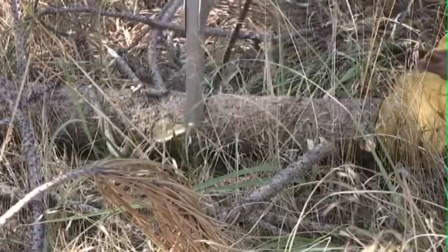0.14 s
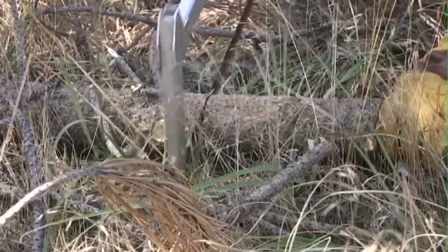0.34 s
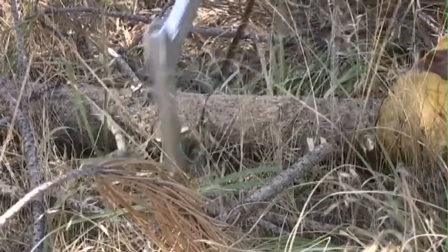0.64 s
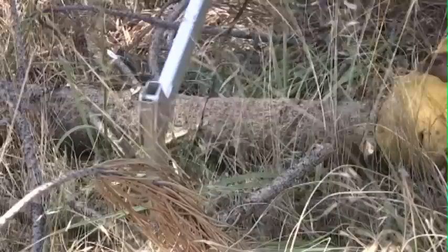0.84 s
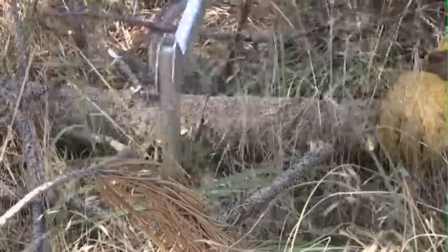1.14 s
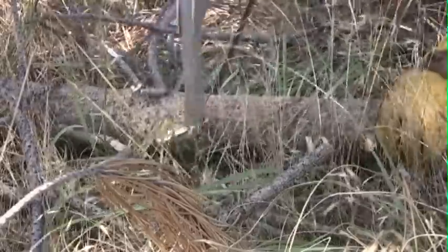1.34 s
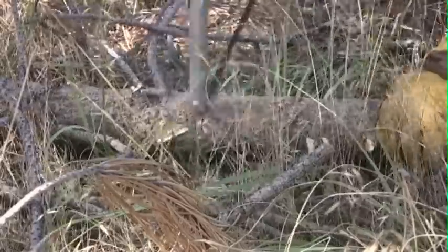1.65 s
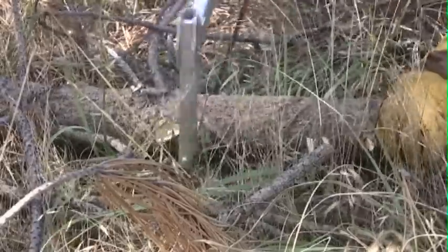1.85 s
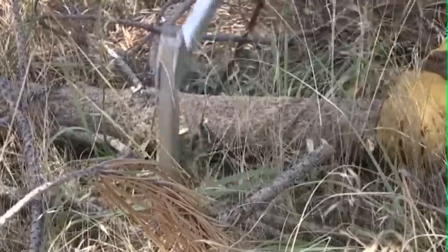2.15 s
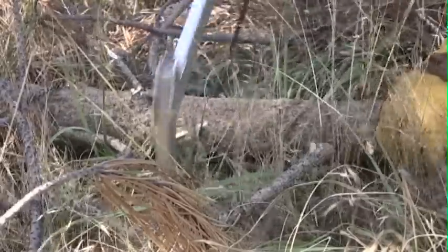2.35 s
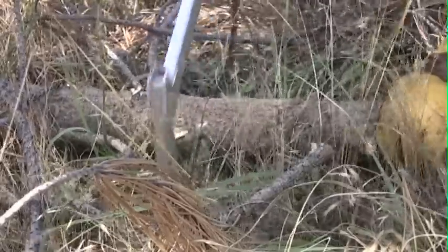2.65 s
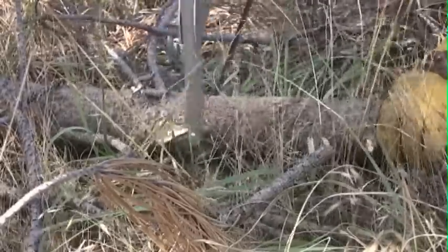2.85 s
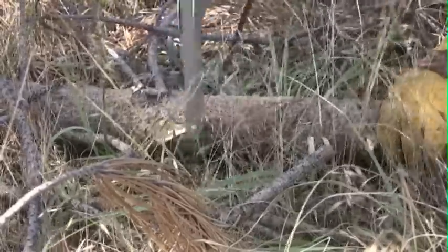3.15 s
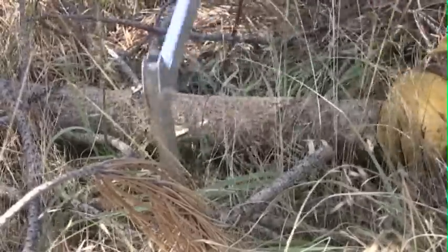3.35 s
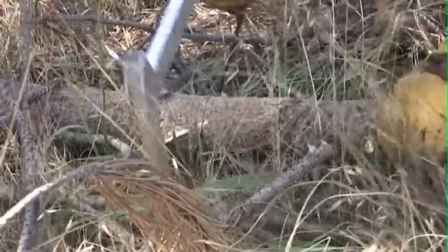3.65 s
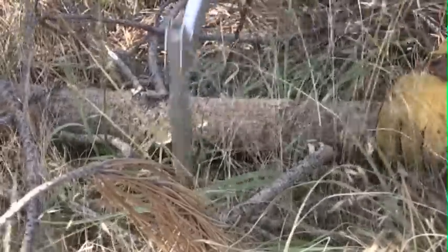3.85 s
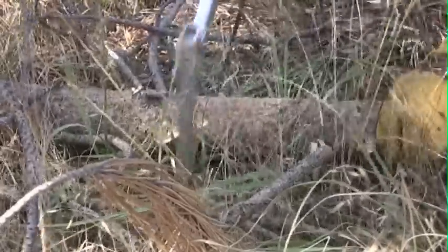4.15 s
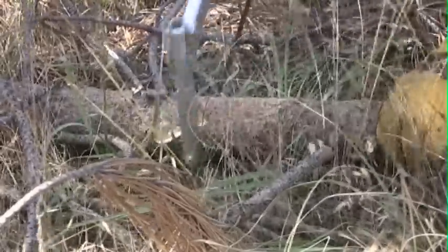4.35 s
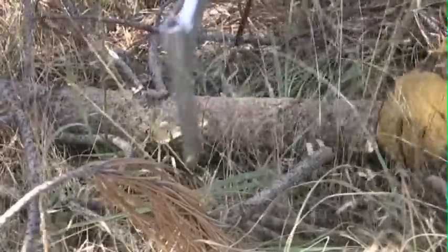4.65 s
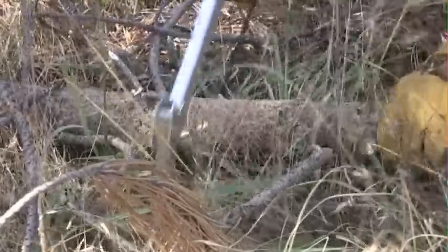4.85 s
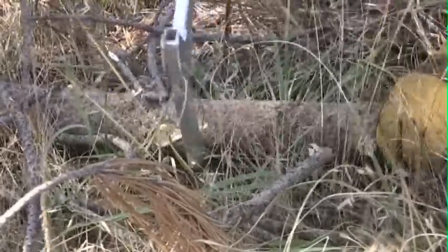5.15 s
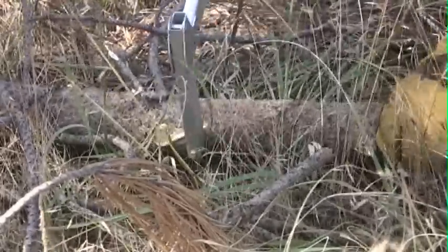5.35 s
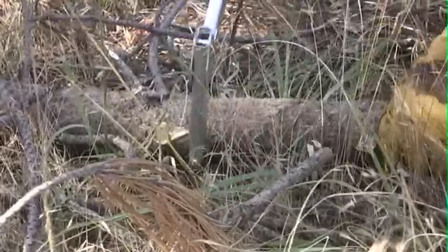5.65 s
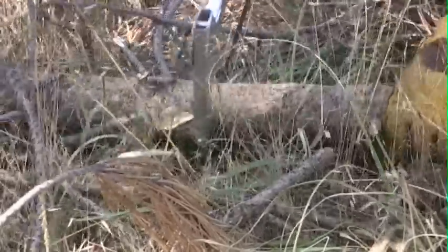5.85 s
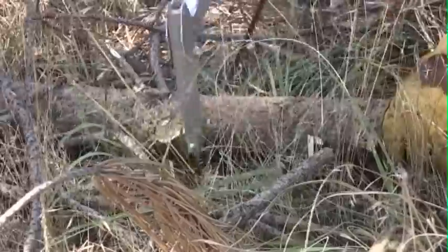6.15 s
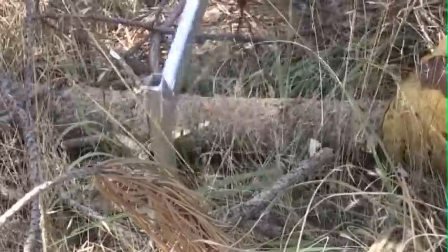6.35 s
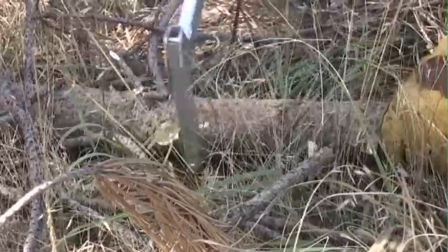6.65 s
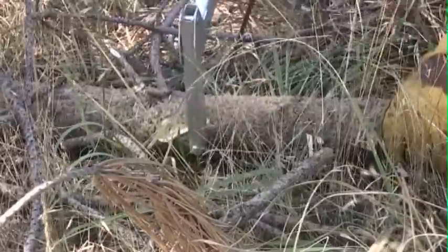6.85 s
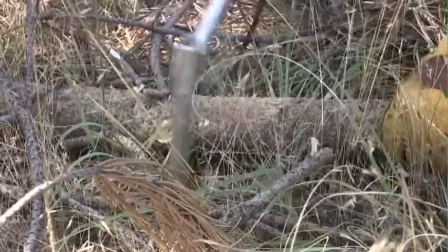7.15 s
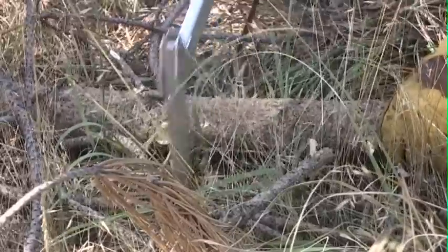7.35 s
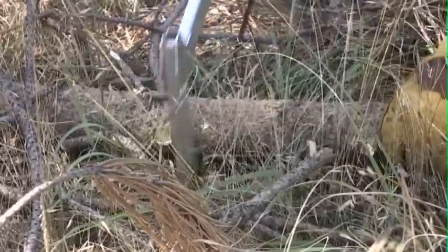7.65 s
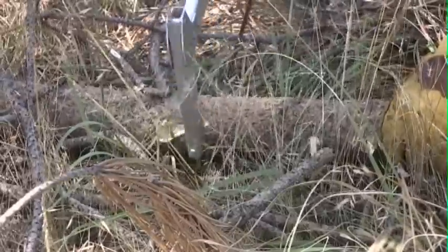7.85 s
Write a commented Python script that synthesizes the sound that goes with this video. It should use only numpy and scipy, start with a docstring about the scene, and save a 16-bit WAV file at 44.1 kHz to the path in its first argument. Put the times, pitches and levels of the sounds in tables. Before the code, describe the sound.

Brisk hand sawing of a dry log outdoors: steady raspy strokes, snags and clicks, then a break-up into rustles, scrapes and fresh strokes.

```python
"""A bow saw rasps to and fro through a dead log: random tooth jolts shake noise through blade and log notes.
Steel gives a bright fizz, wood a duller rasp; teeth snag, tick and judder among short pitched bursts.
Knocks and soft scuffs on the log ring two notes. Light drags and rustles fill the pauses with jolted noise.
A low sine hum wavers, lumpy filtered wind blows and low swings of pressure buffet the microphone."""
import sys
import numpy as np
from scipy import signal
from scipy.fft import rfft, irfft, next_fast_len
from scipy.io import wavfile
from scipy.ndimage import uniform_filter1d

SR = 44100
rng = np.random.default_rng(int(sys.argv[2]) if len(sys.argv) > 2 else 0)


def int16_out(signal):
    """Quantize to a 16-bit WAV file."""
    q = np.round(np.clip(np.atleast_2d(signal).T, -1, 1) * 32767)
    wavfile.write(sys.argv[1], SR, q.astype(np.int16))


N = 352359

# saw strokes: (start [s], length [s], rise [s], relative fizz level after the rise [dB],
# same before the release [dB], wood over fizz at the start [dB], same at the end [dB])
STROKES = [(0.073, 0.12, 0.032, -32, -26.5, -19.5, -12), (0.235, 0.11, 0.015, -22, -26.5, -13.5, -6),
           (0.374, 0.13, 0.053, -25.5, -21.5, -13.5, -16), (0.526, 0.12, 0.015, -25.5, -26.5, -10, -4.5),
           (0.677, 0.14, 0.056, -24.5, -28, -6.5, -28), (0.833, 0.098, 0.032, -21, -23.5, -11, -3.5),
           (0.937, 0.19, 0.097, -24.5, -23, -6, -23), (1.138, 0.12, 0.016, -31, -24, -8, -14),
           (1.286, 0.14, 0.048, -31.5, -28, -20, -18.5), (1.431, 0.11, 0.021, -30.5, -19.5, -14.5, -4.5),
           (1.533, 0.19, 0.088, -24.5, -25.5, -13, -10), (1.751, 0.066, 0.028, -15, -42, -13, -28),
           (1.804, 0.13, 0.026, -22, -41.5, -4.5, -41), (2.047, 0.12, 0.026, -29.5, -22.5, -12, -5),
           (2.212, 0.13, 0.036, -25.5, -25, -6, -18.5), (2.346, 0.12, 0.043, -26.5, -22.5, -7.5, -14),
           (2.488, 0.14, 0.017, -28.5, -27, -6, -17.5), (2.636, 0.11, 0.016, -34, -21, -10.5, -12.5),
           (2.795, 0.14, 0.032, -22, -29, -9.5, -29.5), (2.94, 0.12, 0.034, -26, -25, -13, -7),
           (3.046, 0.21, 0.11, -25.5, -35, -9.5, -14.5), (3.289, 0.082, 0.0071, -24, -20, -7.5, -17.5),
           (3.43, 0.12, 0.067, -23.5, -30.5, -13.5, -24), (3.579, 0.19, 0.045, -19.5, -48.5, -6.5, -20.5),
           (3.734, 0.14, 0.0042, -25.5, -28, -15, -13.5), (3.889, 0.1, 0.018, -32.5, -20, -9.5, -14.5),
           (4.009, 0.029, 0.0018, -23, -30.5, -14, -7), (4.035, 0.13, 0.028, -29, -24.5, -12.5, -14),
           (4.173, 0.12, 0.0041, -37, -21.5, -14.5, -9.5), (4.344, 0.14, 0.02, -28.5, -32, -15, -20.5),
           (4.491, 0.1, 0.031, -25.5, -23, -14, -12.5), (4.625, 0.091, 0.049, -24, -31, -18.5, -10.5),
           (4.702, 0.11, 0.0085, -23.5, -41.5, -28, -12), (4.793, 0.11, 0.023, -27, -25.5, -13, -9.5),
           (4.907, 0.068, 0.004, -36, -33.5, -18.5, -10), (4.966, 0.13, 0.0039, -24.5, -29.5, -11.5, -15.5),
           (5.128, 0.084, 0.0063, -51, -30.5, -12, -38), (5.203, 0.18, 0.022, -23.5, -43, -20.5, -24),
           (5.768, 0.15, 0.027, -29, -40, -14.5, -47), (6.012, 0.14, 0.038, -21.5, -40.5, -11.5, -25.5),
           (6.189, 0.08, 0.073, -23, -32, -21.5, -8.5), (6.314, 0.12, 0.042, -15.5, -29, -9, -14.5),
           (6.48, 0.12, 0.0015, -35.5, -26, -16, -28), (7.058, 0.09, 0.02, -22, -24.5, -10.5, -12),
           (7.193, 0.15, 0.007, -45, -24, -20.5, -16), (7.395, 0.092, 0.014, -34, -21.5, -11, -8.5),
           (7.498, 0.025, 0.0036, -16.5, -31, -12, 2.5), (7.559, 0.11, 0.046, -27.5, -28.5, -23, -32),
           (7.704, 0.17, 0.045, -21.5, -60, -8.5, -27), (7.835, 0.16, 0.065, -22.5, -48, -20, -16)]
# spectrum of the fizz: (frequency [Hz], relative density [dB])
FIZZ = [(1470, -44), (2500, -20), (4310, -13), (4950, -9.5), (5440, -11.5), (10600, -6), (12500, -0.5),
        (15000, 1.5), (16000, -3)]
# notes of the blade: (frequency [Hz], width [Hz], relative level [dB])
STEEL = [(3940, 250, -9), (4550, 200, -9), (5780, 150, -4), (7220, 200, -9), (9620, 300, -6),
         (11360, 150, -8.5), (13350, 150, -8), (12700, 300, -8)]
# notes of the log: (frequency [Hz], width [Hz], relative level [dB])
WOOD = [(211, 46, 2.5), (343, 14, 1.5), (481, 58, -1.5), (627, 113, 1.5), (1096, 154, -2),
        (1500, 380, -7.5), (1925, 136, -1.5), (3680, 3160, -11.5)]


def gain_of(db):
    """Decibels to amplitude."""
    return 10 ** (np.asarray(db) / 20)


def evened(x):
    """Scales to rms 1."""
    return x / np.sqrt(np.mean(x ** 2) + 1e-20)


def coloured(x, points):
    """Filters by a spectrum of (Hz, dB) points, straight lines over log frequency; rms 1."""
    point_hz, point_db = np.transpose(points)
    size = next_fast_len(N)
    hz = np.fft.rfftfreq(size, 1 / SR)
    level_db = np.interp(np.log(hz + 1), np.log(point_hz), point_db)
    return evened(irfft(rfft(x, size) * gain_of(level_db), size)[:N])


def ring(x, hz, width_hz):
    """One resonance of gain 1 at its centre."""
    return signal.lfilter(*signal.iirpeak(hz, hz / width_hz, SR), x)


def rung(x, modes, shifting_db=0.):
    """A body with several resonances; each swells and fades as the point of contact moves."""
    out = np.zeros(N)
    for k, (hz, width_hz, db) in enumerate(modes):
        push = x * gain_of(shifting_db * wander(0.023))
        out += (-1) ** k * gain_of(db) * ring(push, hz, width_hz)
    return out


def dying(x, decay_s):
    """Each impulse becomes a sudden step that fades exponentially."""
    return signal.lfilter([1], [1, -np.exp(-1 / (decay_s * SR))], x)


def jolts(per_s, spread_db, decay_s, steady):
    """Envelope of random jolts, a few large, over a steady part; rms 1."""
    sizes = gain_of(spread_db * np.minimum(rng.exponential(1, N), 3))
    struck = rng.random(N) < per_s / SR
    return evened(steady + evened(dying(sizes * struck, decay_s)))


def wander(width_s):
    """Slow random drift of rms 1: noise averaged twice."""
    width = round(width_s * SR)
    return evened(uniform_filter1d(uniform_filter1d(rng.standard_normal(N), width), width))


def impulses(times_s, db):
    """An impulse of the given height at each time."""
    x = np.zeros(N)
    x[np.round(times_s * SR).astype(int)] = gain_of(db)
    return x


def add_at(out, start_s, sound):
    """Mixes a sound in at its time, cut off at the end of the scene."""
    part = out[round(start_s * SR):][:len(sound)]
    part += sound[:len(part)]


def played(rows):
    """Each row rises, slides from its first level to its last and lets go; the wood follows by its bite."""
    release_s, edge_db = .03, 15  # a row starts and ends edge_db under its hold
    wood_edge_db = 4.5  # the wood sets in later and stops sooner than the bright part
    bright_power, wood_power = np.zeros(N), np.zeros(N)
    for start_s, length_s, rise_s, first_db, last_db, *bite_db in rows:
        first = max(round((start_s - rise_s) * SR), 0)
        last = min(round((start_s + length_s + release_s) * SR), N)
        t = np.arange(first, last) / SR - start_s
        held = np.clip((t - rise_s) / max(length_s - rise_s - release_s, .005), 0, 1)
        edges = np.maximum(1 - t / rise_s, 0) + np.maximum(1 - (length_s - t) / release_s, 0)
        level_db = first_db + (last_db - first_db) * held - edge_db * edges
        wood_over_db = np.interp(t, [0, length_s], [bite_db[0], bite_db[-1]])
        bright_power[first:last] += gain_of(level_db) ** 2
        wood_power[first:last] += gain_of(level_db - wood_edge_db * edges + wood_over_db) ** 2
    return np.sqrt(bright_power), np.sqrt(wood_power)


def lingering(envelope, decay_s, share):
    """Part of the sound dies away after its cause has stopped."""
    return envelope + share * dying(envelope, decay_s) / (decay_s * SR)


def grainy(x, spread_db):
    """Random patches of colour: short wide ones, and long narrow ones that sing for 50 ms."""
    for size in (128, 1024):
        z = signal.stft(x, nperseg=size)[2]
        patches = uniform_filter1d(rng.standard_normal(z.shape[::-1]), size=4, axis=0)  # over time
        patches = uniform_filter1d(patches, size=3, axis=1)  # over frequency
        x = signal.istft(z * gain_of(spread_db * evened(patches).T), nperseg=size)[1][:N]
    return evened(x)


def flexed(x, modes, spread_db, shift, climb_db=0):
    """Each stroke flexes the body: notes shift in pitch and strength; upper ones peak late in hard strokes."""
    deepest = 0.74  # share of a stroke at which the upper notes peak
    pieces = np.split(x, [round(row[0] * SR) for row in STROKES])
    chance = rng.standard_normal((len(pieces), len(modes), 2))
    hardness = [0] + [np.clip(max(row[-2:]) + 14, 0, 10) for row in STROKES]  # from the wood levels
    lengths_s = [row[1] for row in STROKES[:1] + STROKES]
    out = []
    for piece, draws, hard, length_s in zip(pieces, chance, hardness, lengths_s):
        progress = np.arange(len(piece)) / SR / length_s
        climb = climb_db * hard * np.maximum(.25 - abs(progress - deepest), -.5)
        total = np.zeros(len(piece))
        for k, (hz, width_hz, db) in enumerate(modes):
            level_db = db + spread_db * draws[k, 0] + climb * k
            total += (-1) ** k * gain_of(level_db) * ring(piece, hz * (1 + shift * draws[k, 1]), width_hz)
        out.append(total)
    return np.concatenate(out)


def drags_and_rustles():
    """Light drags and rustles in the pauses: soft bright jolted hiss, some with dull wood scuffing."""
    # drags and rustles: (start [s], length [s], rise [s], relative hiss level first [dB],
    # same last [dB], wood scuff over the hiss first [dB], same last [dB])
    drag_rows = [(1.879, .16, 0.065, -28.5, -26, -27, -14.5), (5.086, 0.084, 0.025, -39, -23, -29, -26.5),
                 (5.309, 0.095, 0.032, -45, -33.5, -17, -20), (5.354, 0.52, 0.13, -28.5, -58, -35, -47),
                 (5.584, 0.099, 0.028, -27, -79, -13, -10), (5.89, 0.135, 0.013, -47, -22.5, -58, -41),
                 (6.106, 0.18, 0.0036, -26, -33.5, -52, -35), (6.598, 0.15, 0.058, -33, -30, -47, -18),
                 (6.7, 0.23, 0.13, -33, -60, -19.5, -48)]
    # spectrum of the hiss: (frequency [Hz], relative density [dB])
    hiss_spectrum = [(710, -88.5), (1200, -24), (2150, -14.5), (3550, -12.5), (5300, -10.5), (16000, 5.5)]
    # faint stirring under everything: (time [s], relative level [dB])
    stirring_rows = [(0, -32), (.06, -59), (.12, -43), (3.1, -67), (3.25, -43), (3.45, -42), (5.6, -44),
                     (6.85, -39), (6.9, -39), (7.02, -53.5), (7.2, -35.5), (7.99, -39)]
    drag, scuff = played(drag_rows)
    rubbing = jolts(160, 5., 0.002, steady=1.9) * rng.standard_normal(N)
    hiss = grainy(coloured(rubbing + 1.2 * flexed(rubbing, STEEL, 2.5, .04), hiss_spectrum), 2.5)
    stirring_db = np.interp(np.arange(N) / SR, *np.transpose(stirring_rows))
    stirring = gain_of(stirring_db + 4.6 * wander(0.059))
    thin_hiss = evened(np.gradient(hiss) + .05 * hiss)  # mostly the slope of the hiss
    wood = evened(rung(rubbing, WOOD[3:], 4.))
    return drag * hiss + stirring * thin_hiss + (scuff + 0.0076 * stirring) * wood


def surroundings():
    """Lumpy wind is filtered noise; the low hum is a sine wavering in pitch and level."""
    # surroundings: (time [s], relative wind level [dB], relative hum level [dB])
    air_rows = [(0.0, -44.5, -53), (0.38, -90, -40.5), (1.11, -51, -53), (1.24, -54, -41), (1.88, -55, -52),
                (1.96, -35, -52), (2.29, -25, -47), (2.4, -34.5, -41), (3.0, -36, -46), (3.69, -37, -55),
                (3.83, -33, -36), (3.96, -45, -48), (4.81, -34, -43.5), (4.94, -50, -62),
                (5.23, -48, -45.5), (5.47, -62, -43.5), (5.82, -63, -42.5), (5.92, -65.5, -39),
                (5.94, -57.5, -59), (6.41, -57, -37), (6.63, -67, -85), (6.76, -53.5, -43),
                (6.98, -78, -45), (7.03, -63, -63), (7.2, -59, -47.5), (7.43, -54.5, -52), (7.99, -70, -58)]
    # spectrum of the wind: (frequency [Hz], relative density [dB])
    wind_spectrum = [(15, -64.5), (25, -40), (55, -4.5), (91, -0.5), (130, -0.5), (330, -18.5), (430, -37),
                     (730, -120)]
    mean_hum_hz = 87.3
    s, *columns = np.transpose(air_rows)
    wind_db, hum_db = (np.interp(np.arange(N) / SR, s, c) for c in columns)
    wind = coloured(rng.standard_normal(N) * gain_of(4.9 * wander(0.012)), wind_spectrum)
    turns = np.cumsum(mean_hum_hz * (1 + 0.054 * wander(0.0453))) / SR
    hum = np.sqrt(2) * np.sin(2 * np.pi * turns) * gain_of(5.3 * wander(0.071))
    return gain_of(wind_db + 2.0) * wind + gain_of(hum_db) * hum


def saw():
    """The same tooth jolts shake the steel blade and the log; harder bite sounds more wood."""
    fizz, wood = played(STROKES)
    teeth = jolts(300, 0.9, 0.008, steady=0.7)
    tearing = teeth * jolts(500, 3., .0008, steady=1.8) * rng.standard_normal(N)
    steel = grainy(coloured(tearing + 3. * flexed(tearing, STEEL, 3., .02), FIZZ), 2.4)
    fibres = teeth * jolts(150, 0.41, 0.00053, steady=4.4) * rng.standard_normal(N)
    log = grainy(flexed(fibres, WOOD[1:], 2.5, .025, climb_db=0.21), 2.8)
    deepening = gain_of(np.linspace(-7, 0.5, N))  # the lowest note grows as the cut deepens
    log = log + 0.5 * deepening * evened(ring(fibres, *WOOD[0][:2]))
    return 1.36 * lingering(fizz, 0.0017, 0.091) * steel + 1.287 * lingering(wood, 0.0018, 0.11) * log


def pitched_bursts():
    """Cracks, scrapes, narrow squeaks and low notes: short noise, each through its own resonance."""
    # pitched bursts: (time [s], peak [dB], frequency [Hz], width [Hz])
    burst_rows = [(0.23, -24, 5000, 4000), (0.539, -23, 2840, 1200), (0.637, -16.5, 1970, 596),
                  (0.646, -16.5, 2000, 603), (0.996, -25.5, 378, 69.6), (1.171, -19, 2920, 1500),
                  (1.18, -22, 3040, 1200), (1.216, -20, 3160, 800), (1.228, -18, 3450, 1200),
                  (1.7608, -25, 2800, 1800), (1.7715, -24, 6100, 900), (1.818, -15, 2920, 1500),
                  (1.832, -14, 2860, 1200), (1.84, -18, 3000, 1200), (3.12, -23, 373, 40),
                  (4.6608, -21.5, 2450, 2500), (4.911, -29, 1900, 90), (4.983, -29.5, 1990, 90),
                  (5.1295, -25, 3400, 2000), (5.14, -22.5, 3750, 2500), (5.18, -21, 4600, 2000),
                  (5.2127, -25, 2080, 800), (5.218, -20, 4200, 2500), (5.245, -33, 1100, 120),
                  (5.26, -16, 6000, 2500), (5.343, -45, 3600, 120), (5.355, -48, 1480, 120),
                  (5.371, -52, 1500, 120), (6.043, -16.5, 4530, 1500), (6.197, -27, 4970, 900),
                  (6.251, -29, 5160, 900), (6.287, -29, 4100, 1200), (6.674, -33, 2250, 900),
                  (6.829, -38, 1890, 700), (6.937, -39.5, 4640, 2000), (7.1085, -14, 1820, 700),
                  (7.306, -25.5, 3650, 700), (7.393, -33, 5000, 4000)]
    decay_s = 0.0019  # of the noise; narrow resonances ring longer
    out, t = np.zeros(N), np.arange(1500) / SR
    noise = rng.standard_normal((len(burst_rows), len(t))) * np.exp(-t / decay_s)
    for (s, peak_db, hz, width_hz), burst in zip(burst_rows, noise):
        sound = ring(ring(burst, hz, width_hz), hz, 2 * width_hz)
        add_at(out, s, gain_of(peak_db) * sound / abs(sound).max())
    return out


def knocks_and_scuffs():
    """Knocks and soft scuffs on the log: a short push and a fading rattle ring two notes."""
    # knocks and scuffs: (time [s], relative level [dB], thud over the hollow note [dB])
    knock_rows = [(0.246, -22, -20), (0.494, -27, -5), (1.082, -11, -10), (1.687, -11, -9),
                  (2.002, -17, -10), (2.31, -11, -11), (2.6, -16.5, -10), (2.911, -22, -6),
                  (3.201, -10.5, -10), (3.525, -18, -15), (3.84, -10.5, -14.5), (4.137, -8.5, -15.5),
                  (4.213, -28.5, -26), (5.307, -22, -12), (5.607, -34.5, 3.5), (5.797, -39.5, 3.5),
                  (6.244, -18.5, -5), (6.829, -47.5, 15), (7.328, -32.5, 10), (7.924, -36, 6.5)]
    thud_hz, thud_width_hz = WOOD[0][:2]
    out = np.zeros(N)
    for s, knock_db, thud_db in knock_rows:
        hollow_hz = 690 * rng.uniform(0.91, 1.06)  # each lands at a slightly different spot
        push = np.zeros(4000)
        push[:30] = np.hanning(30)
        push[30:900] = 0.5 * rng.standard_normal(870) * np.exp(-np.arange(870) / 150)  # rattle
        hollow = ring(ring(push, hollow_hz, 170), hollow_hz, 330)
        thud = ring(ring(push, thud_hz, thud_width_hz), thud_hz, 200)
        add_at(out, s, gain_of(knock_db) * (3.98 * hollow + 14.6 * gain_of(thud_db) * thud))
    return out


def ticks():
    """Each tick is a millisecond of bright noise of its own colour with a faint after-rattle."""
    # bright ticks: (time [s], peak [dB])
    tick_rows = [(0.5348, -8), (1.1644, -9), (1.7718, -8), (2.0708, -11), (2.4364, -9), (2.6654, -14),
                 (3.2968, -8), (3.6847, -14), (3.7461, -7), (3.7504, -4), (4.3619, -9), (4.3906, -8),
                 (4.6627, -3), (4.671, -6), (4.681, -4), (4.691, -8), (4.7008, -5), (4.7175, -8),
                 (4.9819, -4), (5.001, -7), (5.011, -8), (5.028, -8), (5.037, -6), (5.0594, -4),
                 (5.4578, -12), (5.8105, -11), (6.1557, -12), (6.4795, -8), (6.484, -7), (6.489, -8),
                 (6.5, -7), (6.503, -6), (6.509, -9), (6.514, -8), (6.518, -9), (6.6731, -13), (6.727, -7),
                 (6.8027, -3), (7.1213, -9), (7.514, -15), (7.6135, -8), (7.7811, -10)]
    out, t = np.zeros(N), np.arange(500) / SR
    for s, peak_db in tick_rows:
        noise = rng.standard_normal(len(t))
        fade = (t > .0001) * (1 - t / t[-1]) * (np.exp(-t / .0008) + .15 * np.exp(-t / .005))
        tick = noise * fade
        tick = tick + 3. * ring(tick, rng.uniform(6000, 15000), 2500)
        tick = np.append(0, np.diff(tick, 2))  # brightens
        add_at(out, s, gain_of(peak_db) * tick / abs(tick).max())
    return out


def snags():
    """A tooth snags and snaps free: a short bright burst that also rings the log."""
    # snags: (time [s], relative snap level [dB], wood ring over the snap [dB])
    snag_rows = [(0.55, -8, -28), (0.596, -5, 3), (0.604, -3, -16), (0.638, 1, -20), (0.647, -5.5, -15),
                 (0.654, -8, -1), (0.918, -1, -3), (1.159, -0.5, -11), (1.7598, -3, -6), (1.8167, 3, -11),
                 (2.508, -19.5, 13), (3.0586, 4, -9), (3.2, 2, -13), (3.266, -3.5, -9), (4.001, -5.5, -1.5),
                 (4.909, -1.5, -6), (4.979, -4.5, -9), (6.0093, -1, -22), (6.042, -5.5, -1.5),
                 (6.7277, -2, -19), (7.11, 4.5, -20), (7.139, -4.5, -7), (7.1848, -12.5, -9),
                 (7.464, 0, -7), (7.498, 7, -14), (7.724, -2.5, -5.5), (7.7689, 2, -14)]
    s, snap_db, ring_db = np.transpose(snag_rows)
    hiss = coloured(rng.standard_normal(N), FIZZ)
    burst = dying(impulses(s, snap_db), 0.0038)
    push = dying(impulses(s, snap_db + ring_db), 0.0044) * rng.standard_normal(N)
    return 0.22 * burst * hiss + 0.76 * rung(push, WOOD[5:])


def buffets():
    """Wind buffets the microphone: each a short low lump of pressure, a couple of swings long."""
    # buffets: (centre [s], relative level [dB], frequency [Hz])
    buffet_rows = [(1.964, -17, 96), (2.073, -17, 95), (2.24, -12.5, 114), (2.285, -22, 126),
                   (2.334, -16.5, 130), (2.385, -24, 125), (2.508, -17, 112), (2.545, -14.5, 88),
                   (2.727, -20, 102), (2.823, -15, 100), (2.905, -15, 127), (3.154, -16, 113),
                   (3.239, -17.5, 110), (3.413, -22, 105), (3.768, -17.5, 86.5)]
    half_width_s = 0.012
    out, t = np.zeros(N), np.arange(-2000, 2000) / SR
    for (s, level_db, hz), phase in zip(buffet_rows, rng.random(len(buffet_rows))):
        swings = np.cos(2 * np.pi * (hz * t + phase))
        add_at(out, s + t[0], gain_of(level_db - 4) * np.exp(-(t / half_width_s) ** 2) * swings)
    return out


def judder():
    """The pinched blade slips unevenly tooth by tooth, each slip ringing upper notes of the log."""
    # judder: (start [s], end [s], slip rate [1/s], relative level [dB])
    judder_row = (6.091, 6.18, 68, -31)
    start_s, end_s, per_s, level_db = judder_row
    s = np.arange(start_s, end_s, 1 / per_s)
    chance = rng.standard_normal((20, 2))[:len(s)]
    slips = dying(impulses(s + .0015 * chance[:, 0], level_db + 1.5 * chance[:, 1]), .001)
    return 8. * ring(rung(slips * rng.standard_normal(N), WOOD[5:7]), 1900, 800)


def scene():
    """Everything at the microphone."""
    saw_and_log = saw() + snags() + ticks() + pitched_bursts() + judder() + knocks_and_scuffs()
    return (saw_and_log + drags_and_rustles() + surroundings() + buffets())[None]


def record(dry):
    """The band limit of the recorder: a symmetric low-pass."""
    edge_hz = 15800
    low_pass = signal.firwin(511, edge_hz, window=("kaiser", 7), fs=SR)
    return signal.oaconvolve(dry, low_pass[None], "same")


dry = scene()
out = record(dry)
int16_out(out)
```